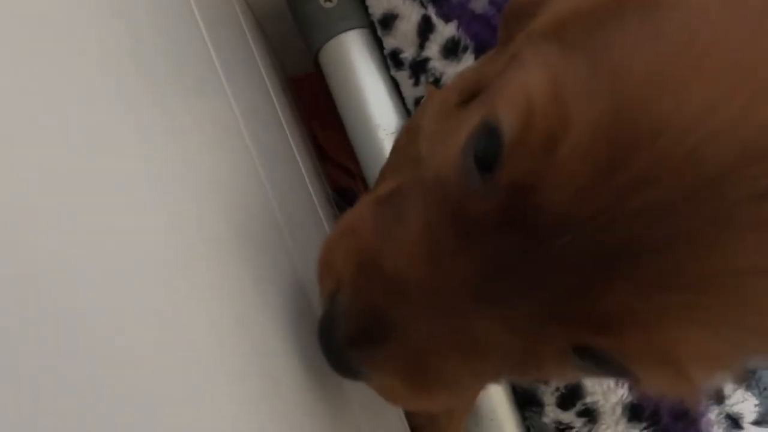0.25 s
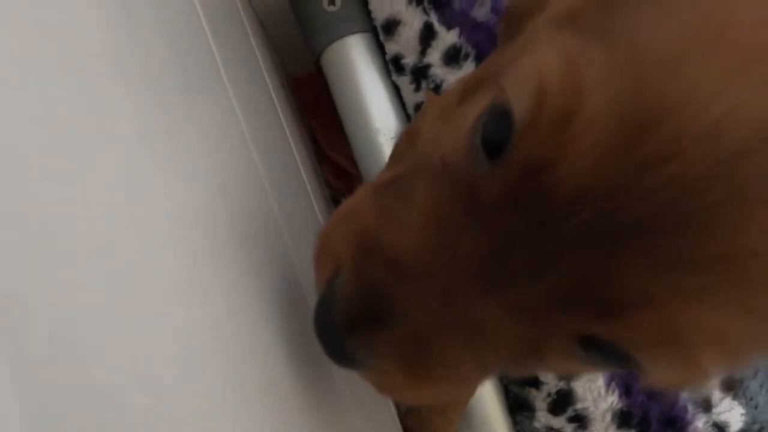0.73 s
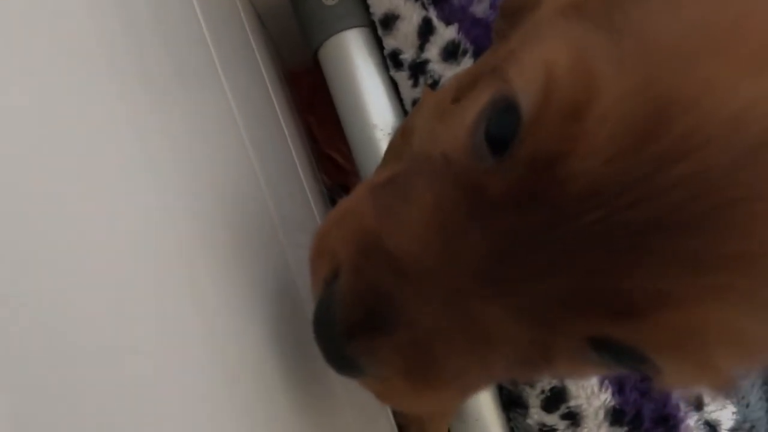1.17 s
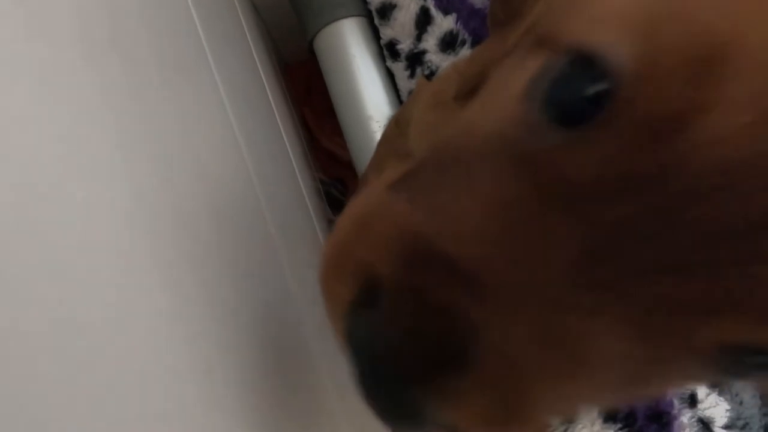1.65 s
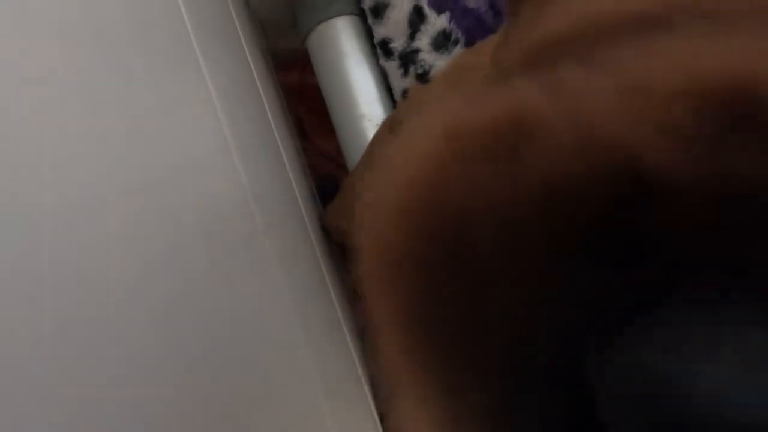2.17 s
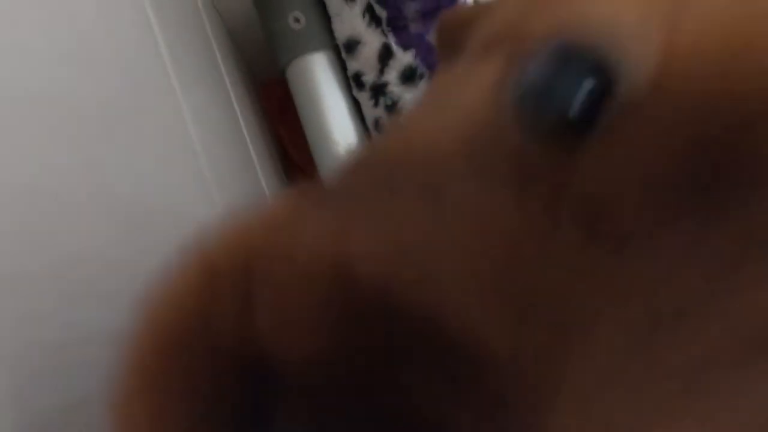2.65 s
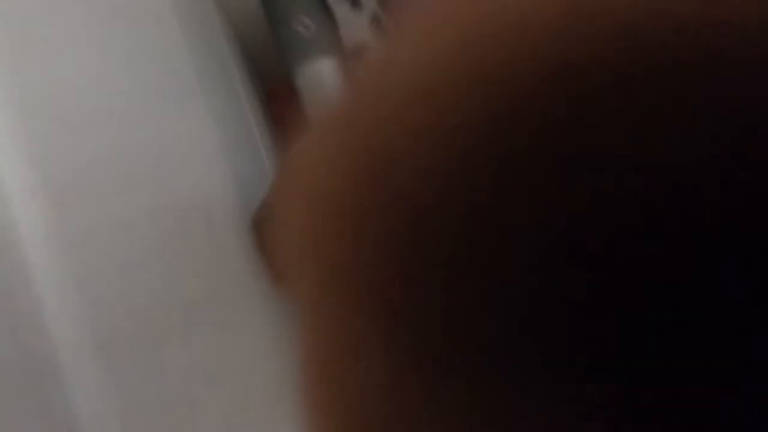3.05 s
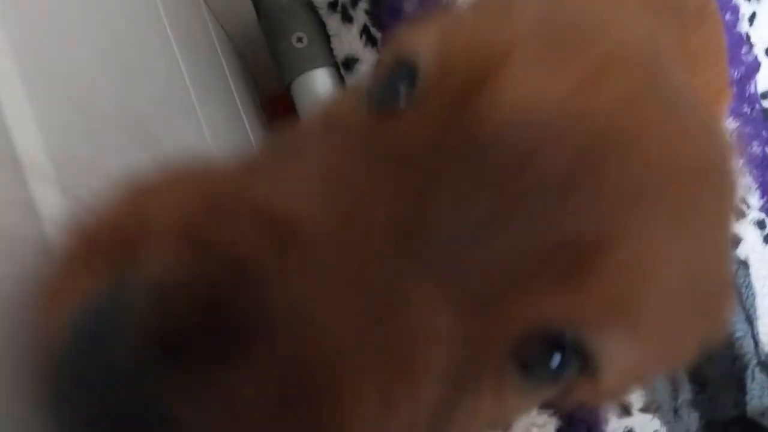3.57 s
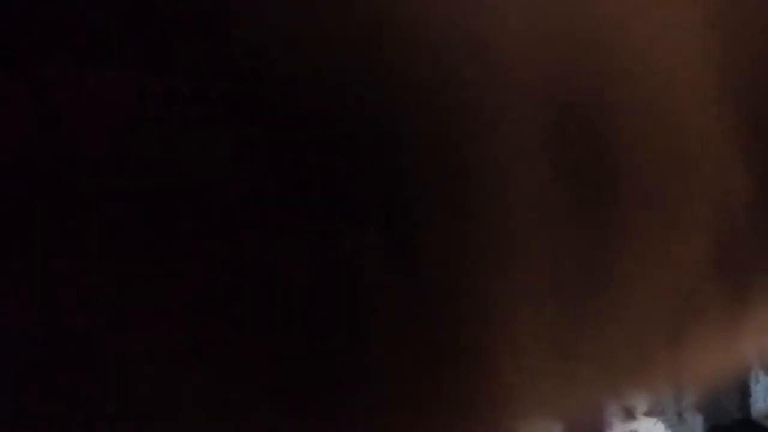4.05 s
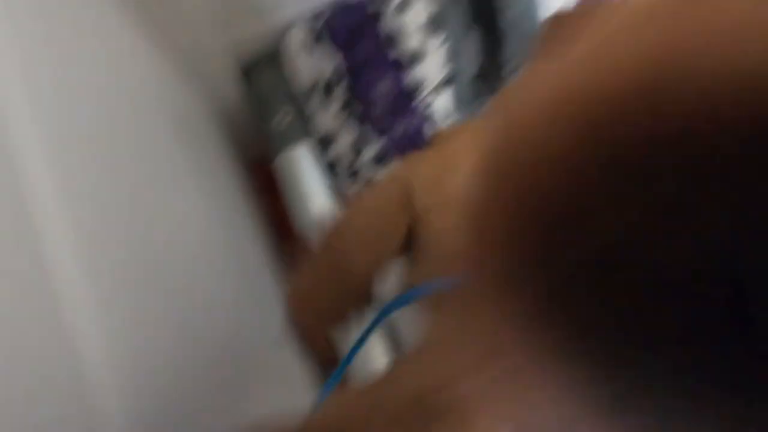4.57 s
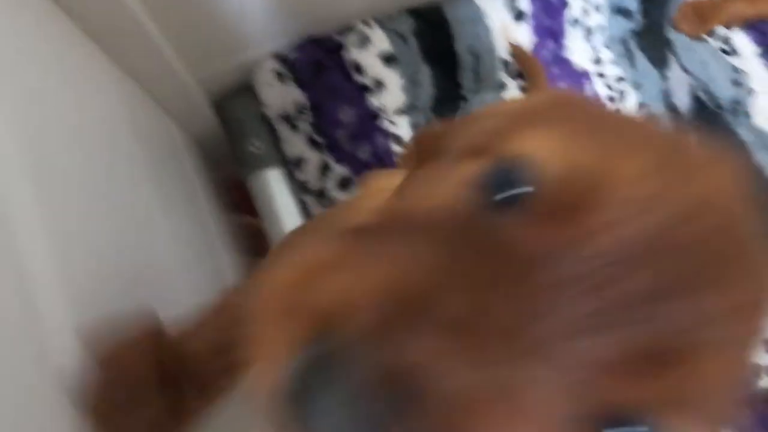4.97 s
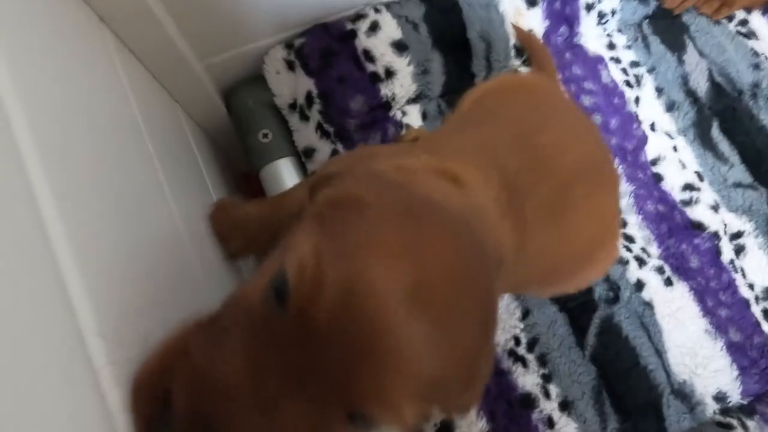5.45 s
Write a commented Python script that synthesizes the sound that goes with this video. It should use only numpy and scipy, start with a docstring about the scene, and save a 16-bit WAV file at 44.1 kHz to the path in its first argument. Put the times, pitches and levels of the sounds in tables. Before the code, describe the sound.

A puppy gives three short nasal whines and a low yip close by, sniffs, then scrambles with thuds, claw ticks and rustling fleece.

```python
"""Puppy in a pen

Three nasal whines and a low yip, close by: harmonic tones with pitch breaks, shaped by throat resonances.
Sniffs, puffs and a muzzle scrape at the microphone are coloured noise and low rings.
Then it scrambles up the pen wall: thuds ring modes of panel and padded floor, claws tick on plastic,
fur and fleece rustle as noise strokes. A faint room tail and quiet room noise lie beneath."""
import sys
import numpy as np
from scipy import signal
from scipy.fft import rfft, irfft, next_fast_len
from scipy.io import wavfile
from scipy.ndimage import uniform_filter1d

SR = 44100
rng = np.random.default_rng(int(sys.argv[2]) if len(sys.argv) > 2 else 0)


def master_out(mix):
    """Clip the mix to full scale and print it as 16-bit PCM to the path in sys.argv[1]."""
    frames = np.transpose(np.atleast_2d(mix))
    ceiling = np.clip(frames, -1, 1)
    pcm = np.round(ceiling * 32767).astype(np.int16)
    wavfile.write(sys.argv[1], SR, pcm)


N = 252252
T = np.arange(N) / SR
CUTOFF_HZ = 15900

# Table levels are relative: sources add their own gains. Spectra are scaled to rms 1, modes to strength 1.

# Quiet room noise. Each row: frequency in Hz, density in dB per Hz.
QUIET = [(25, -1.5), (170, -2.5), (330, -20.5), (700, -26.5), (5000, -34), (10000, -46.5), (16000, -58)]
QUIET_DB = -58
ROOM_T60_S, ROOM_DB = 0.36, -26.5
# Side of the whole puppy. Each row: time in seconds, left over right in dB.
SIDE = [(1.85, 5), (2.05, -2.5), (2.3, -7.5), (2.5, -27), (2.66, 18.5)]

# Strokes of fur and fleece; the first, dull one is probably a sniff.
# Each row: middle in seconds, length in seconds, level in dB, brightness in dB.
RUB = [(2.719, 0.15, -49.5, -6), (3.137, 0.27, -53.5, 0), (3.346, 0.29, -54, 2.5), (3.56, 0.15, -54, 0.5),
       (3.829, 0.083, -56.5, -3), (3.952, 0.21, -52.5, -5), (4.104, 0.15, -51.5, 0), (4.223, 0.15, -60, -3),
       (4.565, .3, -55.5, -6.5), (4.743, 0.28, -50.5, -3.5), (4.894, 0.18, -49.5, 2), (5.038, 0.24, -55, 2),
       (5.163, .14, -57, 3.5), (5.393, 0.28, -59.5, 2.5), (5.587, 0.17, -45, -0.5)]
# Scuff of a stroke. Each row: frequency in Hz, density in dB per Hz.
SCUFF = [(300, -26), (600, -19), (900, -3), (1400, -1), (2300, -6), (3500, -9.5)]
# Swish of sliding fibres. Each row: frequency in Hz, density in dB per Hz.
SWISH = [(1800, -5), (3000, 3.5), (4700, 1.5), (5800, -4.5), (8500, -7.5), (10500, -34), (13000, -32)]
# Fizz of the fibres. Each row: frequency in Hz, density in dB per Hz.
FIZZ = [(8500, -4), (13000, -17.5), (16000, -31)]
# Rumble dragged along by a stroke. Each row: frequency in Hz, density in dB per Hz.
RUMBLE = [(25, 14.5), (40, -27), (60, 3), (85, -4), (170, -5.5), (280, -16), (500, -24)]
FIZZ_BELOW_DB, FIZZ_PER_BRIGHTNESS = -11, 3.5  # a bright stroke has less scuff and more fizz
# Random light pats and claw taps in each stroke; dB against the stroke.
PAT_DB, PAT_KNOCK_DB, TAP_DB, TAP_HZ = 8.5, 0.5, 4, 2200

# Floor modes. Each row: frequency in Hz, level in dB, t60 in seconds.
BOOM = [(40.2, -5, 0.53), (82.4, -2, 0.27)]
# Wall panel modes. Each row: frequency in Hz, level in dB, t60 in seconds.
BODY = [(114, -0.5, 0.15), (174.8, 2.5, 0.19), (218.1, -5, 0.2), (297.6, -6.5, 0.11), (366.4, -18, 0.13)]
# Higher modes of the knock. Each row: frequency in Hz, level in dB, t60 in seconds.
KNOCK = [(390, -4, 0.012), (698, -6.5, 0.018), (870, 2, 0.005), (1194, -5, 0.015), (1720, -9, 0.008)]
# The puppy's weight lands on the padded floor. Each row: time in seconds, level in dB.
LANDINGS = [(.099, -32), (2.36, -33), (2.579, -17.5), (2.935, -19.5), (3.107, -14.5), (3.292, -15),
            (3.682, -11), (3.936, -12.5), (3.991, -10), (4.626, -17), (5.36, -9.5), (5.489, -26)]
LANDING_BODY_DB, LANDING_KNOCK_DB = -21, -36.5  # share of a landing in the wall's ring and knock
# Paws strike the wall; at 2.49 and 2.524 s the nose bumps the microphone.
# Each row: time in seconds, level in dB, hardness (knock against ring) in dB.
BLOWS = [(2.49, -24, -22), (2.524, -25.5, 3), (2.832, -40, -18), (3.107, -28, -11.5), (3.14, -24, -23),
         (3.189, -24, -14), (3.294, -27.5, -40), (3.334, -27.5, -12.5), (3.444, -26.5, -35),
         (3.478, -30, -38), (3.91, -23.5, -14), (3.938, -30, -6.5), (4.048, -22, -7), (4.564, -20, -3.5),
         (4.745, -28, -9.5), (4.865, -31, -18), (4.897, -21.5, -6), (5.032, -38.5, 1.5),
         (5.163, -30.5, -10.5), (5.49, -34, -41)]
HEAVY_DB, HEAVY_BOOM_DB = -21, -10  # a blow of HEAVY_DB booms at HEAVY_BOOM_DB
BOOM_GROWTH = 3.07                  # dB of boom per dB of blow
WALL_DEEP_DB = -5.5                 # these blows excite the deepest boom mode less

# Claw taps on plastic. Each row: time in seconds, peak level in dB, ring in Hz.
TICKS = [(0.22, -36.5, 1467), (0.894, -41, 2660), (2.384, -36, 3700), (3.105, -18, 2350),
         (3.616, -24.5, 3600), (3.642, -27.5, 2574), (3.653, -40, 4000), (3.674, -31, 4170),
         (3.776, -35.5, 2500), (3.897, -30, 1870), (3.939, -24.5, 5600), (4.528, -12, 4660),
         (4.529, -19, 12500), (4.556, -23, 9700), (4.566, -8, 5240), (4.901, -20, 2640), (4.994, -25, 1280),
         (5.033, -28.5, 3400), (5.348, -30, 3000), (5.539, -31.5, 1490)]
TICK_T60_S = 0.0072

# Nose air puffs against the microphone. Each row: time in seconds, level in dB, ring in Hz.
PUFFS = [(0.097, -39.5, 168), (.302, -15.5, 216), (0.736, -47.5, 167.6), (.903, -27.5, 118),
         (1.159, -22.5, 115), (1.32, -42, 149), (1.809, -33, 136), (2.036, -26, 194), (2.135, -37, 151.2)]
# Low ring of a puff. Each row: multiple of its ring frequency, level in dB, t60 in seconds.
PUFF = [(.68, -9.5, .19), (1, -1.5, .12), (1.5, -2, .06)]

# Muzzle scrape on the microphone. Each row: frequency in Hz, density in dB per Hz.
SCRAPE = [(130, 0.5), (400, 5.5), (600, -5.5), (850, -4), (1400, -23), (2300, -35.5)]
SCRAPE_S, SCRAPE_DB = 2.529, -26
SCRAPE_SWELL_DB_PER_S, SCRAPE_FALL_DB_PER_S = 530, 1300

# Gusts through the nose. Each row: start in seconds, length in seconds, hollow rush in dB, nostril hiss in dB.
GUSTS = [(0, 0.18, -55, -54.5), (0.142, 0.38, -48.5, -46), (0.881, 0.065, -50, -61),
         (0.919, 0.36, -54, -50), (1.284, 0.24, -56.5, -66), (1.536, 0.287, -47.5, -45.5),
         (1.78, 0.14, -56.5, -80), (1.98, 0.16, -49.5, -57.5), (2.268, 0.1, -45.5, -57),
         (2.49, 0.064, -41, -47), (2.539, 0.089, -58, -47)]
# Rush in the muzzle. Each row: frequency in Hz, density in dB per Hz.
RUSH = [(300, -7.5), (680, -12), (950, -21), (1350, -1), (1850, -13.5), (2500, -25), (3200, -23)]
# Hiss at the nostrils. Each row: frequency in Hz, density in dB per Hz.
HISS = [(2550, -22), (3400, -9.5), (4100, -7.5), (4750, 0.5), (5200, -7.5), (6200, -12.5), (7600, -3),
        (8700, -14), (9700, -31.5), (12000, -29.5), (16000, -46)]
GUST_ATTACK_S, GUST_RELEASE_S = 0.027, 0.039

# Three whines and a yip. Each row: start in seconds, attack in seconds, tone in dB, overtones in dB,
# edge of the upper overtones in dB.
CALLS = [(.262, 0.057, -16.5, -12, -35), (.989, 0.016, -15, -15, -27), (1.551, 0.014, -14.5, -14, -19),
         (2.035, 0.0086, -20, -19.5, -44.5)]
# One pitch curve per call, up to the moment of letting go. Each row: time in seconds, pitch in Hz.
PITCH = [
    [(.288, 652), (.316, 736.4), (.335, 709.6), (.348, 716)],
    [(1.0, 890), (1.028, 906), (1.031, 843), (1.05, 870), (1.056, 794), (1.081, 846), (1.118, 811.5),
     (1.158, 799.7), (1.172, 708), (1.19, 696.4), (1.206, 654)],
    [(1.57, 1105), (1.574, 980), (1.603, 999.6), (1.647, 964), (1.702, 841), (1.752, 819.4)],
    [(2.04, 467.8), (2.063, 502.3), (2.072, 412)],
]
# Overtone strength after throat and muzzle. Each row: frequency in Hz, level in dB.
THROAT = [(700, 4), (980, -11), (1400, 2.5), (1750, -9), (2000, -15.5), (2200, -15.5), (2550, -25.5),
          (3000, -13), (3900, -4.5), (4500, -8), (4950, -8), (5350, -20.5), (6500, -25), (7600, -10.5),
          (8800, -29), (9700, -53), (11500, -45), (15000, -65)]
# Air rasping through slack folds. Each row: frequency in Hz, density in dB per Hz.
RASP = [(190, 3.5), (300, 0), (700, 6), (1100, -8), (1450, 3.5), (1900, -10), (2400, -35.5)]
# On letting go the pitch drops and the call dies, overtones first.
DROP_OCTAVES_PER_S, RELEASE_S, RELEASE_DB, CLOSING_DB_PER_S = 23, 0.023, 28, 746.5
OVERTONE_LAG = 1.7                                  # power of the attack with which overtones build
EDGE_OPENS_S = 0.015                                # the edge's attack is longer by this
EDGE_FADES_S, EDGE_FADE_DB = 0.028, -6              # the edge softens shortly before letting go
BREAK_OCTAVES_PER_S = 3                             # a glide this fast doubles the jitter
LAX_HZ, TENSE_HZ, LAX_DB = 760, 800, -9             # lax folds give weaker overtones
NOTCH_HZ, NOTCH_WIDTH_HZ, NOTCH_DB = 938, 69, -13.5  # the nasal passage swallows the tone near this pitch


def from_db(db):
    """Decibels to gain."""
    return 10 ** (np.asarray(db) / 20)


def rms_one(x):
    """Scale to rms 1."""
    return x / np.sqrt(np.mean(x ** 2) + 1e-20)


def at_hz(points, hz):
    """Read a spectrum in dB on a log-frequency axis."""
    f, db = np.transpose(points)
    return np.interp(np.log(np.maximum(hz, 1)), np.log(f), db)


def colour(x, spectrum):
    """Give x a spectrum that falls away beyond its ends; rms 1."""
    size = next_fast_len(x.shape[-1])
    hz = np.fft.rfftfreq(size, 1 / SR) + 1
    below = 1 + (spectrum[0][0] / hz / np.sqrt(2)) ** 6
    above = 1 + (hz / spectrum[-1][0] / np.sqrt(2)) ** 6
    gain = from_db(at_hz(spectrum, hz)) / np.sqrt(below * above)
    return rms_one(irfft(rfft(x, size) * gain, size)[..., :x.shape[-1]])


def drift(rate_hz, size=N):
    """Noise low-passed at rate_hz, rms 1."""
    sos = signal.butter(2, rate_hz, fs=SR, output="sos")
    return rms_one(signal.sosfilt(sos, rng.standard_normal(size + SR // 4))[-size:])


def pan(db):
    """Left and right gains, db apart, with mean 1."""
    gains = from_db(np.array([db, -db]) / 2)
    return gains / gains.mean(0)


def stereo_noise(width):
    """White noise common to both sides, plus an opposed part of gain width."""
    mid, side = rng.standard_normal((2, N))
    return mid + width * side * np.array([[1], [-1]])


def add(out, s, x):
    """Mix x into out from the time s on."""
    i = round(s * SR)
    out[..., i:i + x.shape[-1]] += x[..., :N - i]


def ring(modes, t, scatter_db, detune, contact_s):
    """Decaying modes with a soft onset; level and pitch scatter from blow to blow. Strength 1 in all."""
    hz, db, t60_s = np.transpose(modes)[:, :, None]
    size, shift = rng.standard_normal((2, len(modes), 1))
    gain = from_db(db + scatter_db * size)
    sign = (-1) ** np.arange(len(modes))[:, None]
    decay = from_db(-60 * t / t60_s)
    waves = sign * gain * decay * np.sin(2 * np.pi * hz * (1 + detune * shift) * t)
    onset = 1 - np.exp(-t / contact_s)
    return waves.sum(0) / np.sqrt(np.sum(gain ** 2)) * onset


def room_noise(wander_db=5.5):
    """Quiet coloured noise whose level wanders."""
    return from_db(QUIET_DB + wander_db * drift(11)) * colour(stereo_noise(width=0.1), QUIET)


def room(x, wall_cut_hz=2500, delay_s=0.004):
    """Faint, dull tail of the furnished room: convolution with decaying, low-passed noise."""
    t = T[:SR // 2]
    tail = stereo_noise(width=0.22)[:, :len(t)] * from_db(-60 * t / ROOM_T60_S) * (t > delay_s)
    tail /= np.sqrt(np.sum(tail[0] ** 2))
    tail = signal.sosfilt(signal.butter(1, wall_cut_hz, fs=SR, output="sos"), tail)
    return from_db(ROOM_DB) * signal.fftconvolve(x, tail, axes=1)[:, :N]


def shifting(x, depth_db, rate_hz, count=15):
    """The colour of a rub wanders as the contact moves: each band swells and sinks by itself."""
    size = next_fast_len(N)
    log_hz = np.log(np.fft.rfftfreq(size, 1 / SR) + 1)
    place = np.interp(log_hz, np.log([400, CUTOFF_HZ]), [0, count - 1])
    spectrum = rfft(x, size)
    out = np.zeros(N)
    for k in range(count):
        band = irfft(spectrum * np.maximum(1 - abs(place - k), 0), size)[:N]
        out += band * from_db(depth_db * drift(rate_hz))
    return out


def rubbing(swish_db=-1, fizz_db=-1, drag_db=11, shuffle_db=-68, weight_db=-46, fidget_db=3,
            snags_per_s=300, snag_size=2.55, patchy_db=2.0):
    """Each stroke swells and fades: fibres slide in a swish, catch in tiny snags and drag a rumble along."""
    strokes = np.zeros((3, N))
    for s, length_s, db, bright_db in RUB:
        levels_db = [db - bright_db, db, db + FIZZ_BELOW_DB + FIZZ_PER_BRIGHTNESS * bright_db]
        swell = np.abs(np.sin(np.linspace(0, np.pi, int(length_s * SR)))) ** 1.5
        add(strokes, s - length_s / 2, from_db(levels_db)[:, None] * swell)
    scuff, swish, fizz = strokes
    # between strokes the restless puppy keeps shuffling and shifting its weight
    restless = np.interp(T, [2.1, 2.6], [0, 1]) * from_db(fidget_db * drift(17))
    shuffle = restless * from_db(shuffle_db)
    snags = (rng.random(N) < snags_per_s / SR) * rng.laplace(0, snag_size, N)
    fibres = np.hypot(scuff, shuffle) * colour(rng.standard_normal(N) + snags, SCUFF)
    swish_gain = np.hypot(swish, shuffle / 2) * from_db(swish_db)
    fibres += swish_gain * colour(rng.standard_normal(N) + snags, SWISH)
    fibres += fizz * from_db(fizz_db) * colour(rng.standard_normal(N) + snags, FIZZ)
    fibres = shifting(fibres, depth_db=3, rate_hz=10)
    weight_gain = from_db(drag_db) * scuff + from_db(weight_db) * restless
    weight = weight_gain * colour(rng.standard_normal(N), RUMBLE)
    return fibres * from_db(patchy_db * drift(24)) + weight


def scramble(count=2, spread_db=4):
    """Light contacts at random moments of each stroke: rows of (s, dB of the stroke, firmness dB)."""
    contacts = []
    for s, length_s, db, _ in RUB:
        for when, firm in rng.uniform(-1, 1, (count, 2)):
            contacts.append((s + when * length_s / 2, db, spread_db * firm))
    return contacts


def thuds(boom_db=-3, body_db=7.5, knock_db=9, scrape_t60_s=0.057):
    """Each contact excites floor and panel modes, and scrapes higher modes into a knock."""
    out, t = np.zeros(N), np.arange(SR // 3) / SR
    from_wall = np.array(BOOM) + [(0, WALL_DEEP_DB, 0), (0, 0, 0)]
    contacts = []  # (s, floor modes, boom dB, body dB, knock dB)
    for s, db in LANDINGS:
        contacts.append((s, BOOM, db, db + LANDING_BODY_DB, db + LANDING_KNOCK_DB))
    for s, db, hardness_db in BLOWS:
        boom = HEAVY_BOOM_DB + BOOM_GROWTH * (db - HEAVY_DB)
        contacts.append((s, from_wall, boom, db, db + hardness_db))
    for s, db, firm_db in scramble():
        pat = db + firm_db + PAT_DB
        contacts.append((s, BOOM, pat, pat, db + firm_db + PAT_KNOCK_DB))
    for s, floor, boom, body, knock in contacts:
        blow = from_db(boom + boom_db) * ring(floor, t, scatter_db=0.5, detune=0.026, contact_s=0.0089)
        blow += from_db(body + body_db) * ring(BODY, t, scatter_db=3.5, detune=0.088, contact_s=0.0032)
        scrape = rng.standard_normal(len(t)) * from_db(-60 * t / scrape_t60_s)
        knock_ring = ring(KNOCK, t, scatter_db=3.0, detune=0.079, contact_s=0.00046)
        pad = signal.fftconvolve(scrape, knock_ring)[:len(t)]
        add(out, s, blow + from_db(knock + knock_db) * pad / np.abs(pad).max())
    return out


def ticks(sharpness=1.84, tail_db=-24, tail_t60_s=0.12):
    """Claw taps: noise bursts die fast in a broad resonance, with a faint tail; firmer light taps ring higher."""
    out, t = np.zeros(N), np.arange(SR // 10) / SR
    light = [(s, db + firm + TAP_DB, TAP_HZ * from_db(firm)) for s, db, firm in scramble()]
    decay = from_db(-60 * t / TICK_T60_S) + from_db(tail_db - 60 * t / tail_t60_s)
    for s, db, hz in TICKS + light:
        burst = rng.standard_normal(len(t)) * decay
        tap = signal.lfilter(*signal.iirpeak(hz, sharpness, fs=SR), burst)
        tap = signal.sosfilt(signal.butter(2, min(2 * hz, CUTOFF_HZ), fs=SR, output="sos"), tap)
        add(out, s, from_db(db) * tap / np.abs(tap).max())
    return out


def puffs():
    """A puff of air hits the microphone with a short, low ring."""
    out = np.zeros(N)
    for s, db, hz in PUFFS:
        modes = np.array(PUFF) * [hz, 1, 1]
        puff = ring(modes, T[:SR // 3], scatter_db=0.5, detune=0.078, contact_s=0.001)
        add(out, s, from_db(db) * puff)
    return out


def muzzle_scrape(ragged_db=6.0):
    """The nose rubs along the microphone: rough noise swells, sputters and stops short."""
    swell_db = np.minimum(SCRAPE_SWELL_DB_PER_S * (T - SCRAPE_S), SCRAPE_FALL_DB_PER_S * (SCRAPE_S - T))
    db = np.maximum(SCRAPE_DB + swell_db, -140) + ragged_db * drift(140)
    return from_db(db) * colour(rng.standard_normal(N), SCRAPE)


def nose(rush_db=-1.5, hiss_db=-2.0, flutter_db=0.86):
    """Each gust rises and fades: turbulent air rings in the muzzle and hisses at the nostrils."""
    flow = np.zeros((2, N))
    for s, length_s, *levels_db in GUSTS:
        t = T[:int(length_s * SR)]
        shape = np.minimum(t / GUST_ATTACK_S, 1) * np.minimum((length_s - t) / GUST_RELEASE_S, 1)
        add(flow, s, from_db(levels_db)[:, None] * shape ** 1.5)
    rush, hiss = flow
    air = rush * from_db(rush_db) * colour(stereo_noise(width=0.16), RUSH)
    air += hiss * from_db(hiss_db) * colour(stereo_noise(width=0.68), HISS)
    return air * from_db(flutter_db * drift(50))


def whine(call, pitch, jitter=0.0018, flutter_db=1.14, shimmer_db=0.48, edge_from_hz=1900,
          edge_full_hz=2900, slack_hz=580, rasp=0.24, grit_db=0.5):
    """Tight vocal folds: a tone with pitch breaks, its overtones sliding through fixed throat resonances."""
    start_s, attack_s, tone_db, overtones_db, edge_db = call
    let_go_s = pitch[-1][0]
    t = np.arange(start_s, let_go_s + RELEASE_S, 1 / SR)
    size = len(t)
    rise = np.clip((t - start_s) / attack_s, 0, 1) ** 2
    after_s = np.maximum(t - let_go_s, 0)

    hz = np.interp(t, *np.transpose(pitch))
    # the folds waver more around a pitch break
    glide = np.abs(np.gradient(np.log2(hz))) * SR
    breaking = uniform_filter1d(glide, size=SR // 60) / BREAK_OCTAVES_PER_S
    hz = hz * 2 ** (-DROP_OCTAVES_PER_S * after_s) * (1 + jitter * (1 + breaking) * drift(110, size))
    phase = 2 * np.pi * np.cumsum(hz) / SR
    notch_db = NOTCH_DB / (1 + ((hz - NOTCH_HZ) / NOTCH_WIDTH_HZ) ** 2)
    tone = from_db(tone_db + notch_db) * np.sin(phase)

    opening = rise ** OVERTONE_LAG * from_db(-CLOSING_DB_PER_S * after_s)
    low_db = overtones_db + np.interp(hz, [LAX_HZ, TENSE_HZ], [LAX_DB, 0])
    edge = np.clip((t - start_s) / (attack_s + EDGE_OPENS_S), 1e-3, 1) ** 2
    edge *= from_db(grit_db * drift(300, size))
    edge *= from_db(EDGE_FADE_DB * np.maximum(1 + (t - let_go_s) / EDGE_FADES_S, 0))
    for k in range(2, 19):
        # the harder the folds close, the more of the upper overtones
        upper = np.clip((k * hz - edge_from_hz) / (edge_full_hz - edge_from_hz), 0, 1)
        db = at_hz(THROAT, k * hz) + (1 - upper) * low_db + upper * edge_db
        db += flutter_db * drift(120, size)
        tone += opening * edge ** upper * from_db(db) * np.cos(k * phase) * (k * hz < CUTOFF_HZ)

    # at a low pitch the folds go slack: strong and weak cycles alternate unevenly, air rasps through
    slack = np.clip((slack_hz - hz) / 80, 0, 1)
    tone += slack * opening * rasp * from_db(tone_db) * colour(rng.standard_normal(size), RASP)
    tone *= 1 + slack * (0.13 * np.sin(phase / 2) + 0.12 * drift(350, size))
    level_db = -RELEASE_DB * (after_s / RELEASE_S) ** 2 + shimmer_db * drift(60, size)
    return tone * rise * from_db(level_db) * np.sqrt(2)


def voice(lag_samples=1.3, treble_side=0.25, split_hz=2500):
    """All calls; the left side lags slightly but gets more of the treble."""
    out = np.zeros(N)
    for call, pitch in zip(CALLS, PITCH):
        add(out, call[0], whine(call, pitch))
    low = signal.sosfiltfilt(signal.butter(2, split_hz, fs=SR, output="sos"), out)
    treble = treble_side * (out - low)
    left = np.interp(T - lag_samples / SR, T, out + treble)
    return np.array([left, out - treble])


def scene():
    """Quiet room noise, the panned puppy and its room tail."""
    side_db = np.interp(T, *np.transpose(SIDE), left=0, right=0)
    puppy = rubbing() + thuds() + ticks() + puffs() + muzzle_scrape() + nose() + voice()
    puppy = puppy * pan(side_db)
    return room_noise() + room(puppy) + puppy


def record(dry):
    """Steep elliptic low-pass at CUTOFF_HZ."""
    return signal.sosfilt(signal.ellip(10, 0.1, 90, CUTOFF_HZ, fs=SR, output="sos"), dry)


dry = scene()
out = record(dry)
master_out(out)
```